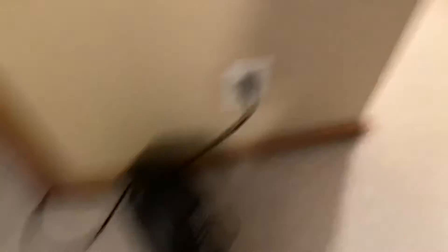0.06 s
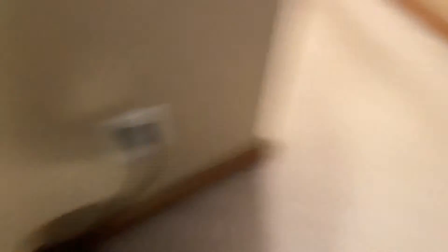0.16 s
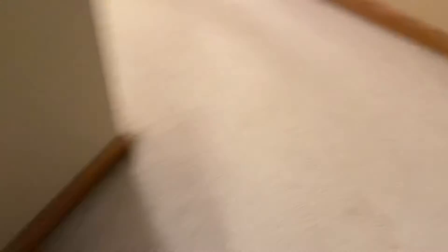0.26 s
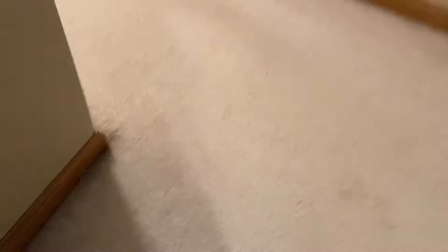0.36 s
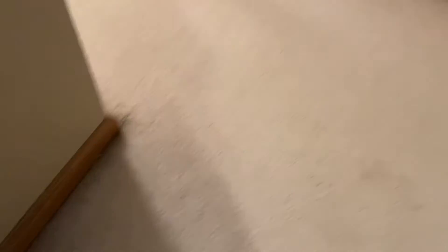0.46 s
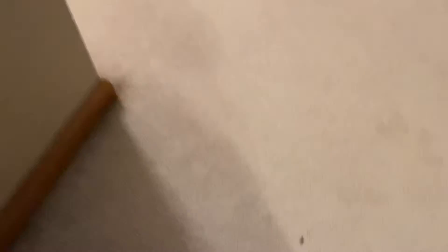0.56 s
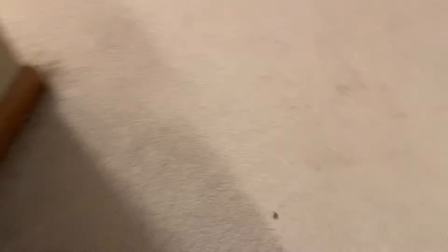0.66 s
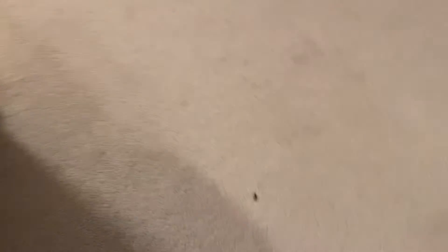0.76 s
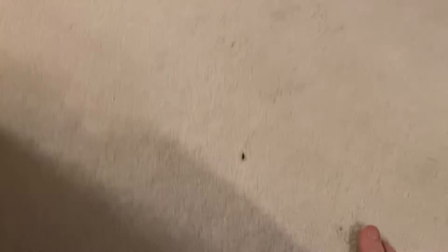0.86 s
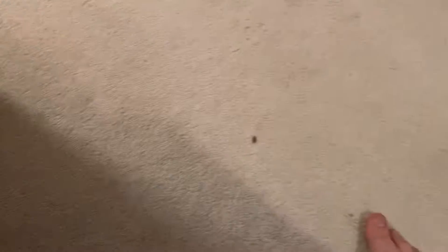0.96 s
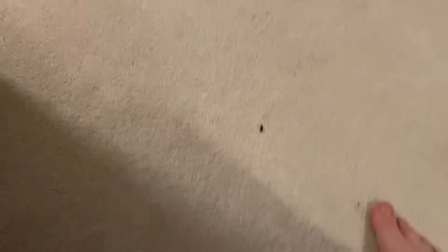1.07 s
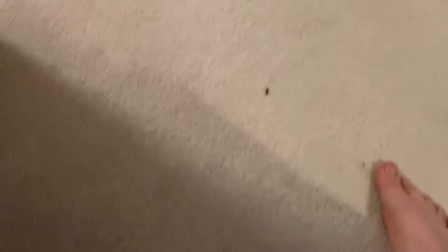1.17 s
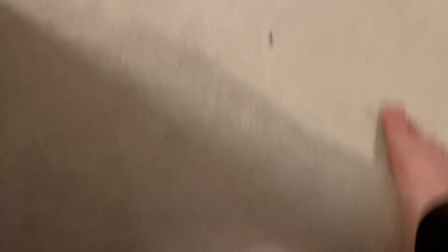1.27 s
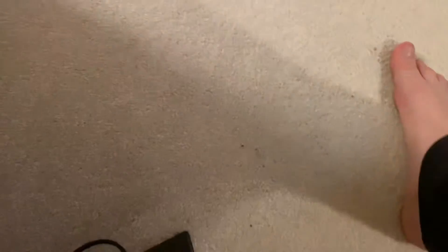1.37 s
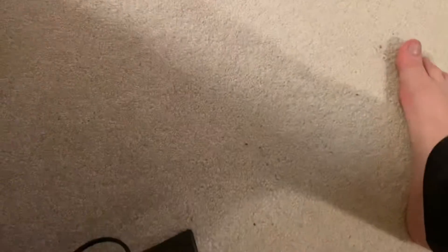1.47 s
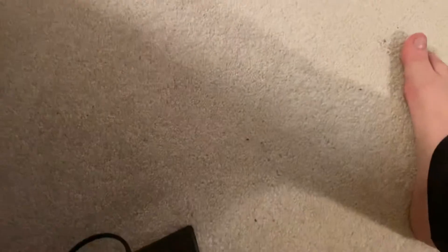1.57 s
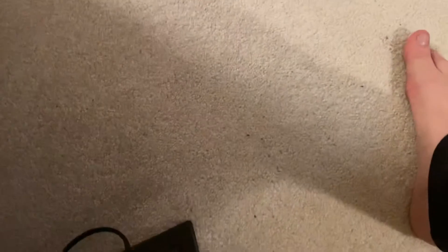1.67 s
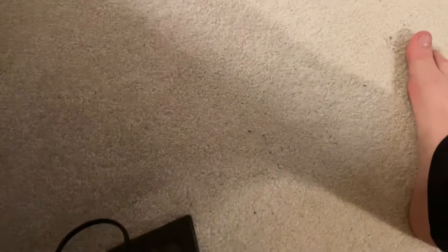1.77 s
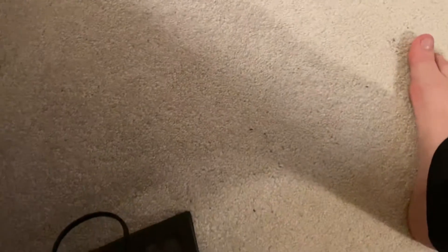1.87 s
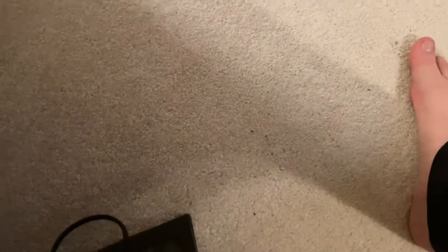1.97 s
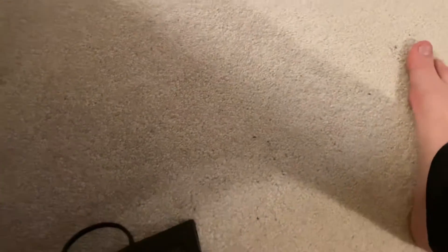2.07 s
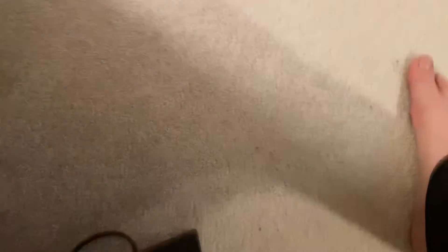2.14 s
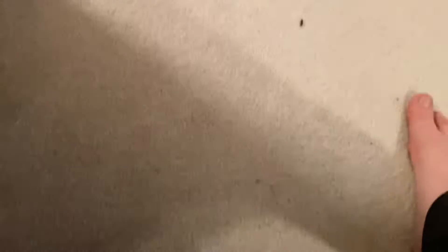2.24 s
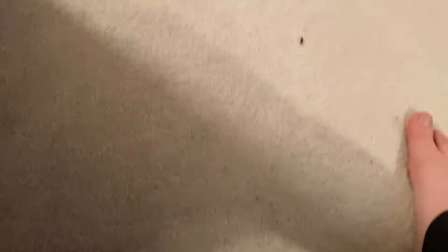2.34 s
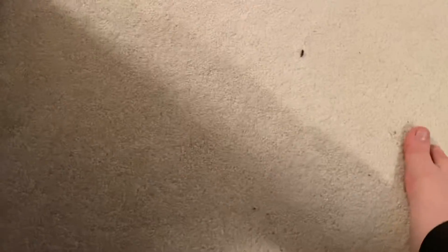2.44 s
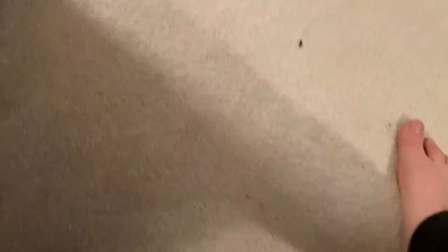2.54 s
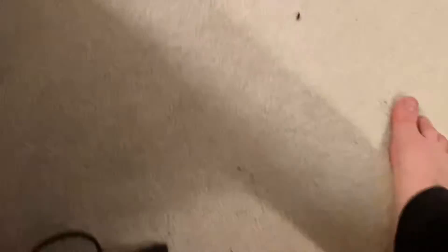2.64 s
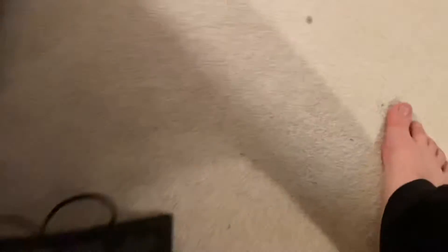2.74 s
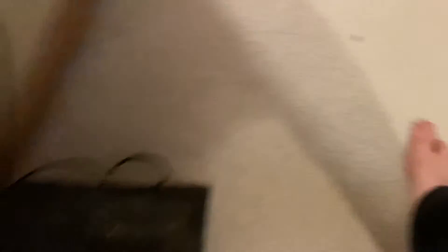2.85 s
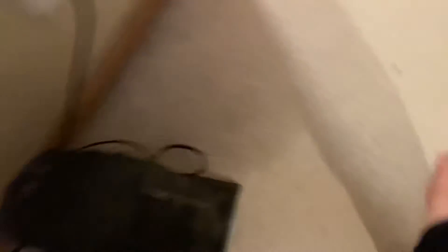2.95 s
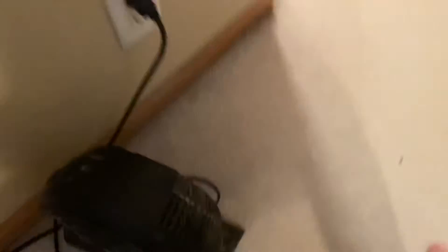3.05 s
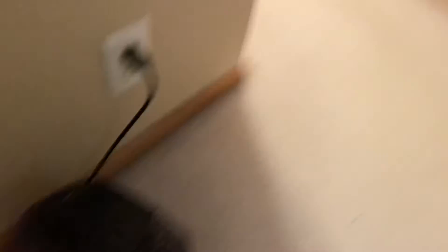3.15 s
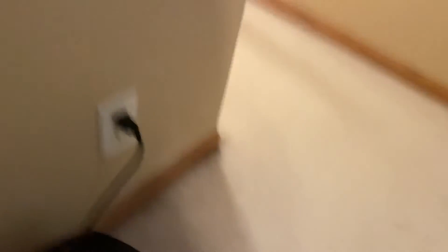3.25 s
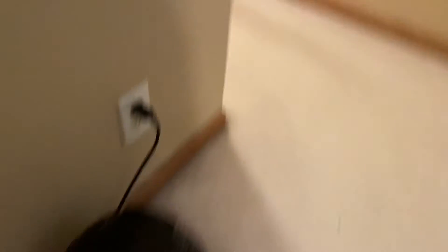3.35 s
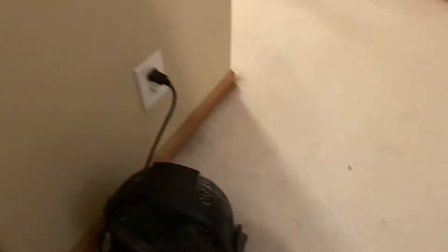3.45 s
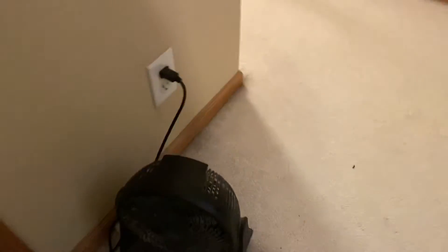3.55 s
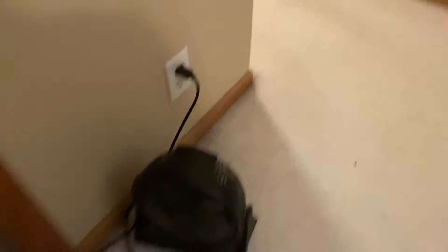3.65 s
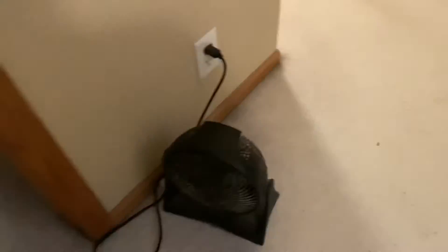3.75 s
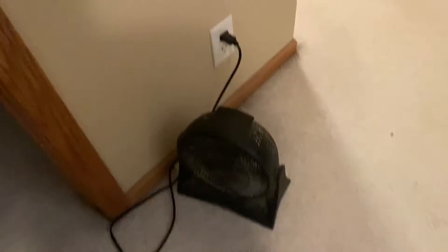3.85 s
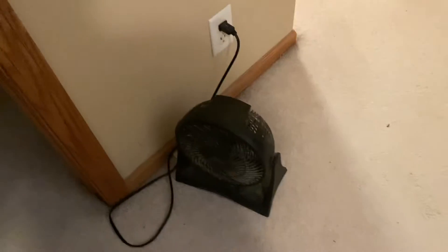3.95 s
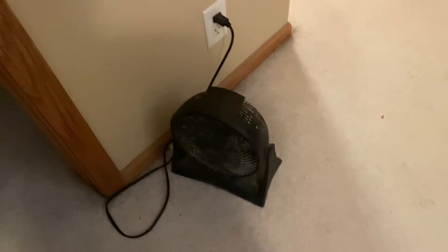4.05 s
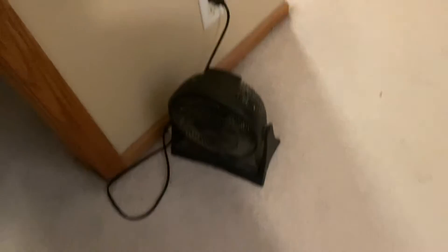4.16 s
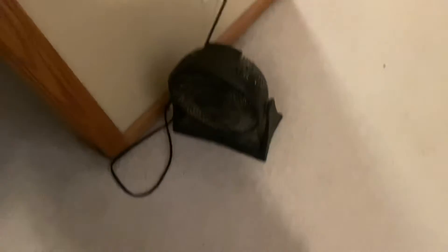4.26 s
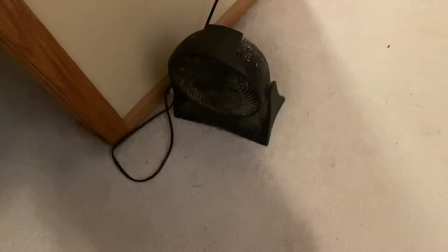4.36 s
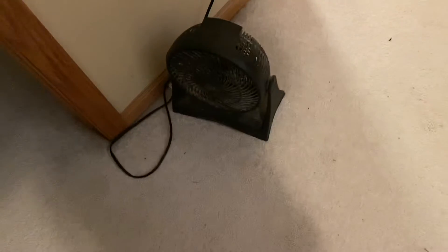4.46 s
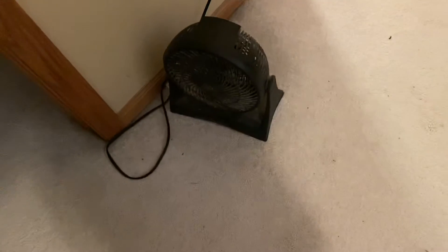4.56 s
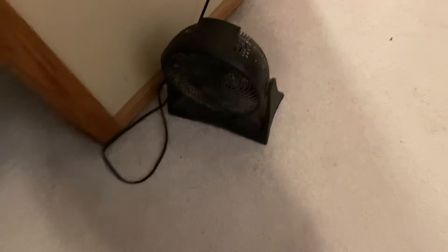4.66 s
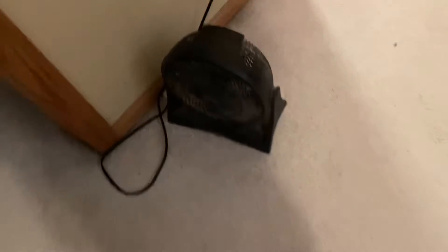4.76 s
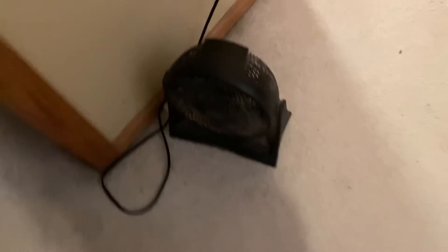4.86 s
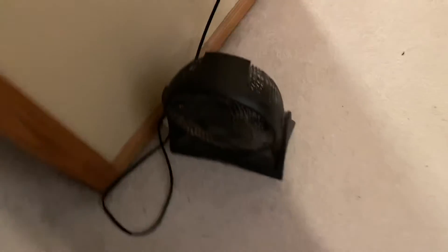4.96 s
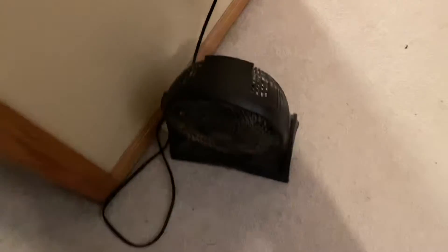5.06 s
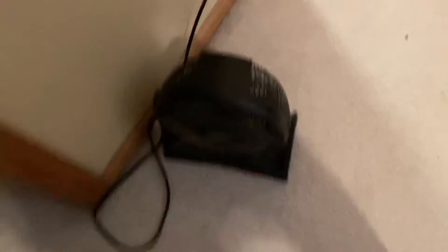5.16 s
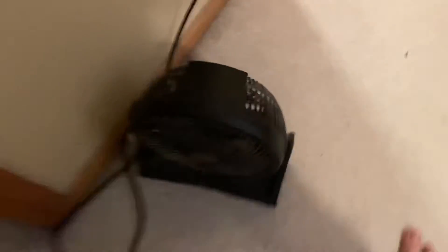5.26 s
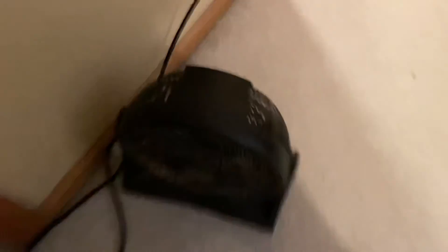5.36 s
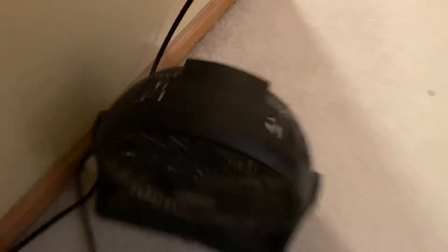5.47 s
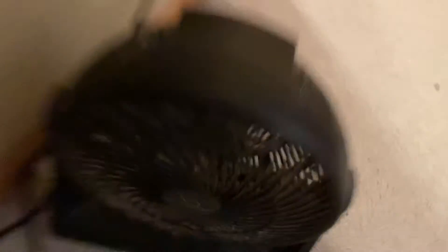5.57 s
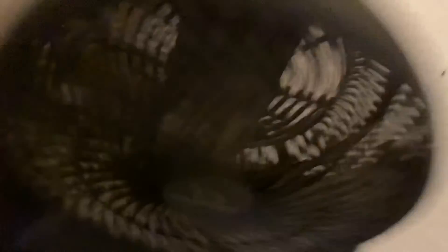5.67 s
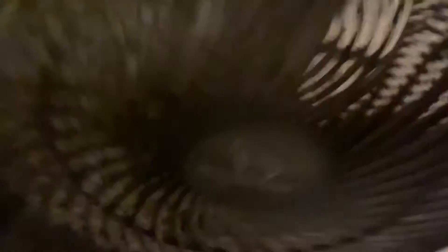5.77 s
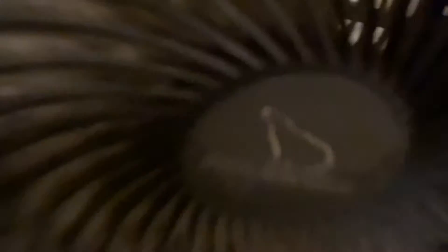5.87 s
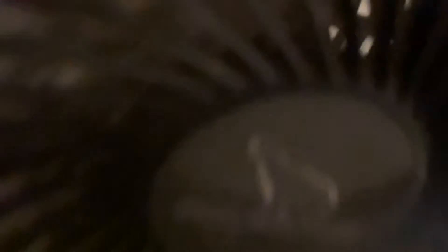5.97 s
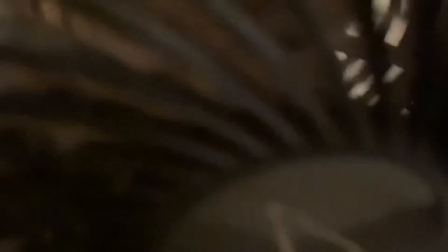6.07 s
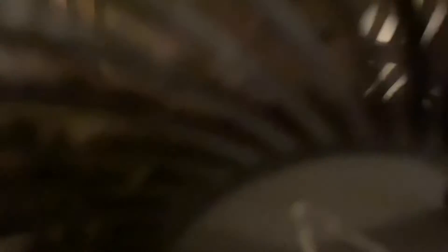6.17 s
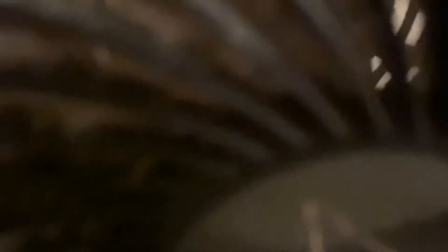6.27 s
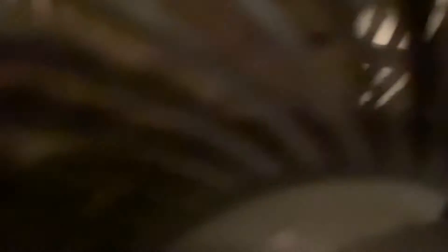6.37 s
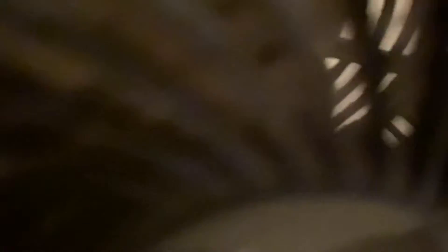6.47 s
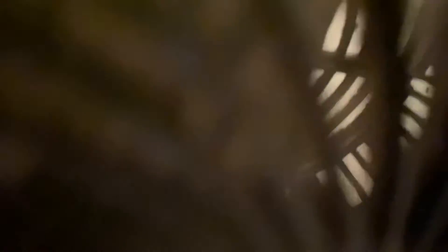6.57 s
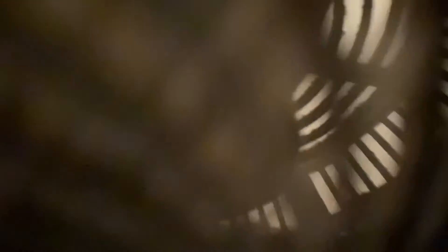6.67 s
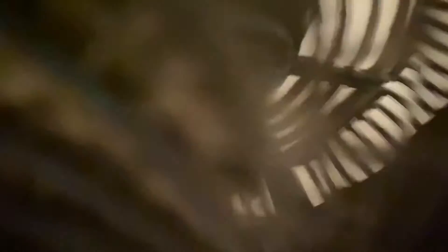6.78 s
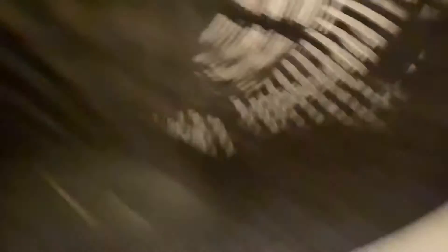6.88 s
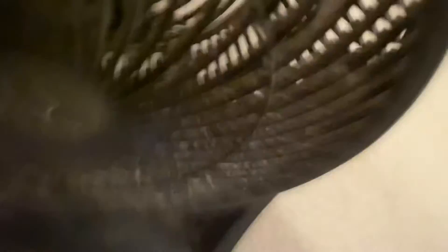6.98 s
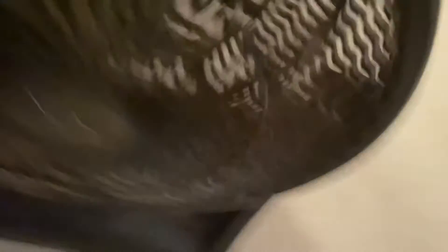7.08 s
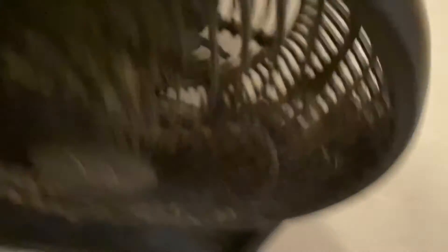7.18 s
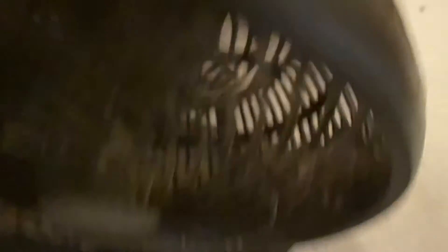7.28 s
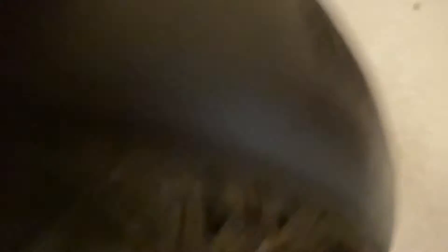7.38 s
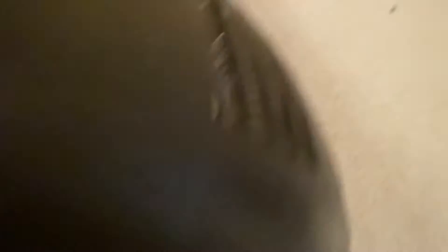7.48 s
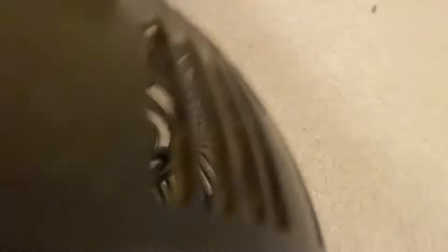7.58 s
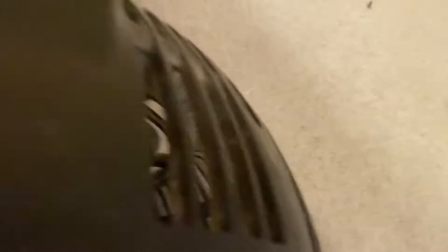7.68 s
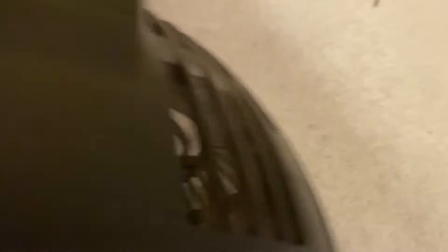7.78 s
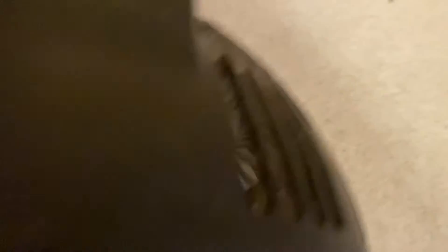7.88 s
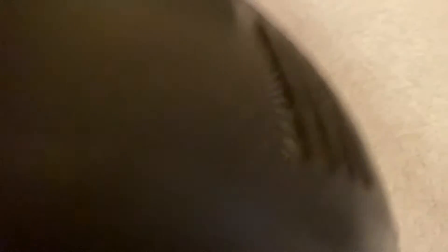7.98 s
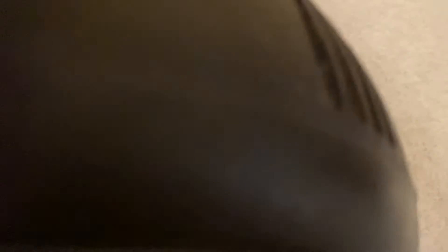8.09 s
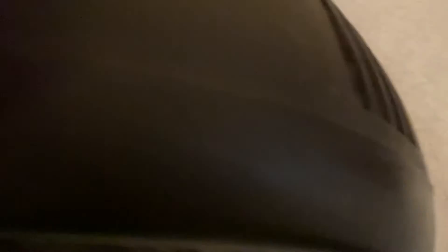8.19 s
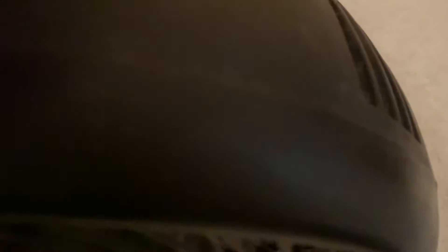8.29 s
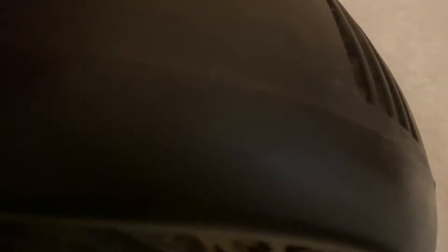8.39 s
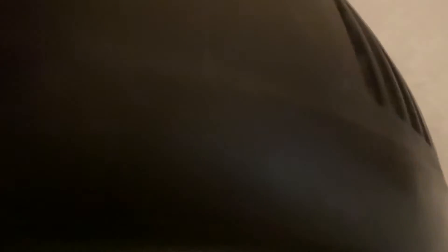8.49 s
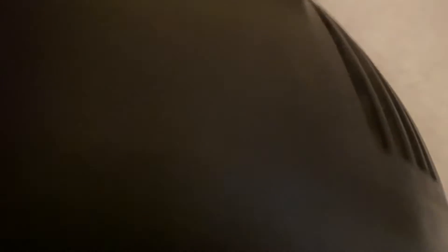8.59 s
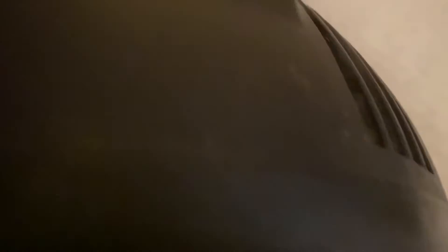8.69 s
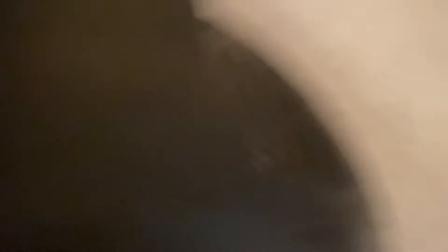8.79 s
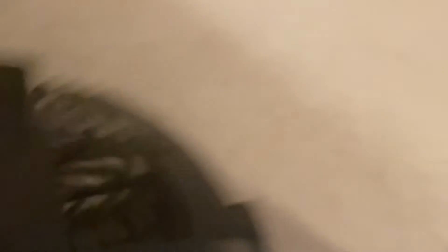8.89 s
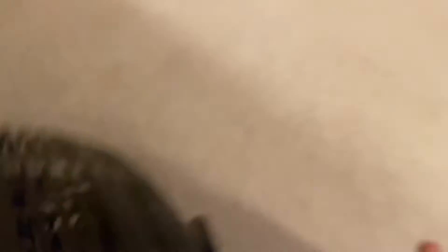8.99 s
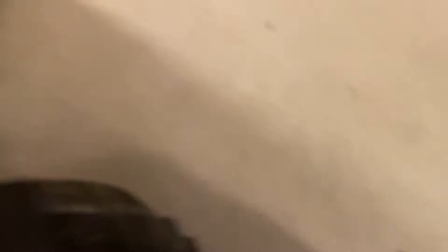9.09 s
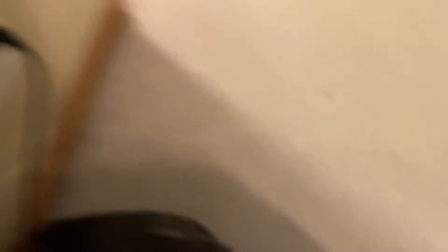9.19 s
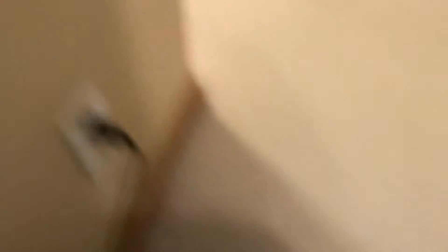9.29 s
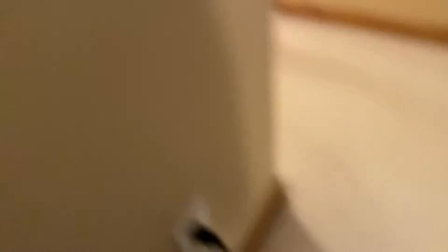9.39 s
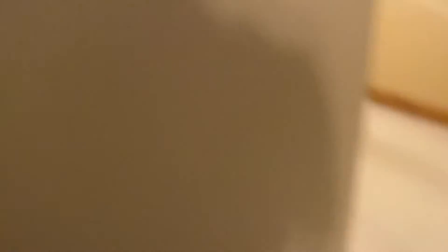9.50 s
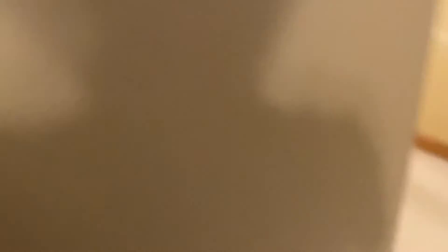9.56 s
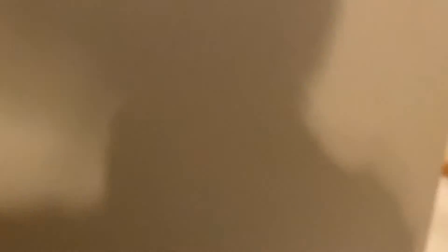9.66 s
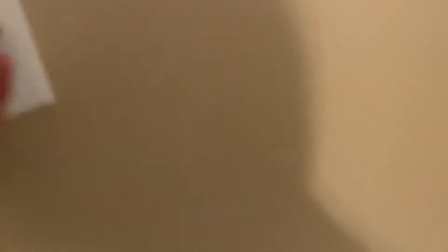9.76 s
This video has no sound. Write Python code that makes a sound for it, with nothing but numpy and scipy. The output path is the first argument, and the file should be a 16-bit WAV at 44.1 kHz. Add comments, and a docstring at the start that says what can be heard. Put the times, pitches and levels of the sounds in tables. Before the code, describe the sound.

A handheld stereo microphone hears low house rumble, soft thuds and cloth rustle, then a fan switched on at a distance. Its whir climbs gradually in pitch, then swells into a very close, gusty roar with blade drone and motor hum. After a click and momentary slowing, a hard click turns it off. The airflow fades away quickly, feet scuff on carpet, and a sharp wall switch clacks.

```python
"""A small three-blade fan on a carpet is switched on with a click and slowly runs up to speed.
Turbulence, blade tones, motor hum and frame buzz follow its speed and the microphone's path into the draught.
A turn of the knob makes the speed sag and recover; then the fan is switched off and coasts.
Filtered noise makes the shuffling of bare feet and clothes; short blows ring resonances for the knob and
case clicks, handling taps and knocks, and a wall switch. Soft thuds and a low rumble fill the quiet room."""
import sys
import numpy as np
from scipy import signal
from scipy.fft import rfft, irfft, next_fast_len
from scipy.io import wavfile
from scipy.ndimage import uniform_filter1d, map_coordinates

SR = 44100
rng = np.random.default_rng(int(sys.argv[2]) if len(sys.argv) > 2 else 0)


def to_wav(s):
    """Save 16-bit WAV."""
    ch = np.atleast_2d(s).T  # columns
    pcm = np.round(np.clip(ch, -1, 1) * 32767)  # PCM
    wavfile.write(sys.argv[1], SR, pcm.astype(np.int16))


N = 433503

ON_S, OFF_S = 2.281, 8.542  # motor current flows between these
FULL_HZ = 144.2  # blade passes per second at full speed
LEFT_RIGHT_HALVES = np.array([[.5], [-.5]])  # splits a left-minus-right dB between the channels


def amp(db):
    """Decibels to gain."""
    return 10 ** (np.asarray(db) / 20)


def rms(x):
    """Root mean square."""
    return np.sqrt(np.mean(x ** 2) + 1e-20)


def unit(x):
    """x at rms 1."""
    return x / rms(x)


def along(points, hz):
    """(Hz, value) points read on a log-frequency axis."""
    f, v = np.transpose(points)
    return np.interp(np.log(hz + 1), np.log(f + 1), v)


def curves(rows):
    """One value per sample for each column after the time."""
    s, *cols = np.transpose(rows)
    return [np.interp(np.arange(N) / SR, s, c) for c in cols]


def during(start_s, end_s, fade_s):
    """1 between two times, fading linearly to 0 outside them."""
    t = np.arange(N) / SR
    return np.clip(1 + np.minimum(t - start_s, end_s - t) / fade_s, 0, 1)


def wobble(rate_hz):
    """Smooth random curve with rate_hz knots a second."""
    knots = rng.standard_normal(int(N * rate_hz / SR) + 4)
    return map_coordinates(knots, [np.arange(N) * rate_hz / SR])


def filtered(x, response):
    """x times a response of frequency."""
    n = x.shape[-1]
    m = next_fast_len(n + 8192)
    return irfft(rfft(x, m) * response(np.fft.rfftfreq(m, 1 / SR)), m)[..., :n]


def ring(x, modes):
    """x through parallel resonances (Hz, width Hz, dB) of alternating polarity."""
    def response(f):
        total = 0
        for k, (hz, width, db) in enumerate(modes):
            damping = 1j * f * width
            total = total + (-1) ** k * amp(db) * damping / (hz * hz - f * f + damping)
        return total
    return filtered(x, response)


def noise(spectrum, alike, lean=((1000, 0),), lead=((1000, 0),)):
    """Stereo noise with a mid of given spectrum and rms 1, correlation, left-right dB and left phase lead."""
    m = next_fast_len(N)
    hz = np.fft.rfftfreq(m, 1 / SR)
    a, b = rfft(rng.standard_normal((2, m)))
    turn = np.arccos(np.clip(along(alike, hz), -.9, .99)) / 2
    shared, apart = np.cos(turn), np.sin(turn)
    left = amp(along(lean, hz)) * np.exp(1j * along(lead, hz))
    mid = np.hypot(abs(left + 1) * shared, abs(left - 1) * apart)
    colour = amp(along(spectrum, hz)) / mid
    pair = np.array([left * (shared * a + apart * b), shared * a - apart * b])
    pair = irfft(colour * pair, m)[:, :N]
    return pair / rms(pair.mean(0))


def blade_rate():
    """Blade passes per second: a slow run-up, a sag under the knob, then air drag brakes the free rotor."""
    pull_hz, run_up_s, knee_hz = 187, 2.38, 2.517  # motor pulls towards pull_hz until the air holds it back
    sag_at_s, sag_fall_s, sag_hz, recover_s = 7.89, 0.117, 12.8, 0.549
    coast_s = 0.92  # time to half speed without current
    t = np.arange(N) / SR
    driven = np.clip(t, ON_S, OFF_S)
    pull = pull_hz * (1 - np.exp(-(driven - ON_S) / run_up_s))
    held = -knee_hz * np.logaddexp(-pull / knee_hz, -FULL_HZ / knee_hz)  # soft minimum
    since = driven - sag_at_s
    recovery = np.exp(-np.maximum(since - sag_fall_s, 0) / recover_s)
    sag = sag_hz * np.clip(since / sag_fall_s, 0, 1) * recovery
    return np.maximum(held - sag, 0) / (1 + np.maximum(t - OFF_S, 0) / coast_s)


def blade_phase(speed):
    """Angle of the blade passes; the speed is never quite steady."""
    return 2 * np.pi * np.cumsum(FULL_HZ * speed * (1 + 0.0041 * wobble(13))) / SR


def place():
    """Closeness of the microphone (1 at 5 cm, falling as 1 / distance) and its share of the draught."""
    # microphone path: time_s, distance_m, draught_share (0 out in the room, 1 in the draught)
    path = [(2.4, 1.05, 0.44), (3.0, 0.7, 0.11), (3.8, 0.57, 0.011), (4.25, 0.51, 0), (4.6, 0.38, 0.028),
            (5.0, 0.29, 0.013), (5.5, 0.17, 0.13), (5.78, 0.069, 0.78), (6.05, 0.049, 0.82),
            (6.75, 0.056, 0.86), (7.2, 0.13, 0.98), (8.2, 0.13, 1), (8.52, 0.12, 1), (8.85, 0.21, 0.99),
            (9.1, 0.4, 0.46), (9.45, 0.75, 0.077)]
    metres, near = curves(path)
    return 0.05 / metres, np.clip(near, 0, 1)


def airflow(phase, speed):
    """Turbulent air at the grille, and eddies on the microphone ports once they are in the draught."""
    # buffet, body, rush and hiss: low_hz, high_hz
    bands = [(55, 100), (170, 700), (1000, 4000), (5000, 8000)]
    # same bands: level_db (full speed, 5 cm), speed_power, out_of_draught_loss_db, rim_gain_db
    laws = [(-21.5, 1, 21.5, 2.5), (-17, 1.83, 1.5, 0), (-26, 2.35, 2, 0), (-41, 2.65, 0.5, -0.5)]
    # depth of the eddies per band: depth_db
    eddy_db = [1.5, 1.5, 0.7, 0.8]
    # gusts on the moving ports: peak_s, half_length_s (to 1/e), buffet_db, body_db
    gusts = [(5.772, 0.057, 9.5, 1.5), (5.912, 0.077, 1.5, 3), (6.29, 0.065, 6, 2.5), (6.48, 0.08, -2, 1.5),
             (6.642, 0.07, 5.5, 5), (6.775, 0.073, 7, 5), (6.9, 0.063, 3, 3.5), (7.02, 0.12, 5.5, 3),
             (8.717, 0.16, 4.5, -1)]
    # colour out in the room, in the draught: freq_hz, relative_db_per_hz
    far_colour = [(25, -38), (55, 8), (160, -6), (260, -0.5), (330, -11), (390, -6.5), (600, -17.5),
                  (950, -20), (1600, -19), (2700, -24), (5000, -36), (7400, -37.5), (11000, -44),
                  (15000, -49)]
    near_colour = [(20, -27), (30, -6), (45, 3.5), (100, 4), (200, -1.5), (330, -7.5), (600, -15.5),
                   (1100, -26.5), (2100, -26.5), (3300, -31.5), (5500, -35.5), (7400, -37.5), (11000, -42),
                   (15000, -48)]
    # left-right correlation, clipped in noise(): freq_hz, correlation
    far_alike = [(60, 0.5), (250, 2), (640, 0.45), (1400, .45), (3100, 0.26), (6000, 1.5), (9000, -4.5)]
    near_alike = [(60, 0.87), (200, 0.62), (400, 0.5), (700, 0.67), (1400, 0.53), (2400, 0.8), (4400, .85),
                  (7500, 0.75)]
    # left minus right: freq_hz, lean_db
    far_lean = [(60, 0), (250, -3), (550, -0.5), (900, 4.5), (1650, 1), (3500, 5), (7500, 0.5)]
    near_lean = [(60, 0.5), (110, -0.8), (200, 3.5), (380, 6.5), (700, 13.5), (1290, 9.5), (2380, 6),
                 (4400, 5.5), (7500, 4)]
    # left port leads in the draught: freq_hz, lead_rad
    near_lead = [(60, 0.2), (300, 0.5), (800, 1.0), (1300, 2.63), (2100, 0.16), (4000, 0.23), (7000, 0.5)]
    # microphone off the axis, beside the rim: start_s, end_s, fade_s
    at_rim = (7.9, 9.0, 0.24)
    # housing screens the hiss: start_s, end_s, fade_s (the fades overlap, peaking near 0.8 of the loss)
    behind_housing = (7.77, 7.65, 0.32)
    screen_db = -2.5
    chop_depth = [0.03, 0.19, 0.17, 0.21]  # per band
    flutter_depth = 0.15  # once per turn, out of the draught

    close, near = place()
    far_air = noise(far_colour, far_alike, far_lean)
    near_air = noise(near_colour, near_alike, near_lean, near_lead)
    centres = np.sqrt(np.prod(bands, axis=1))
    eddies = near * (0.6 * wobble(14) + 0.95 * wobble(55))
    t = np.arange(N) / SR
    buffet_db, body_db = sum(np.outer(dbs, np.exp(-((t - s) / length) ** 2)) for s, length, *dbs in gusts)
    swell_db = [buffet_db, body_db, 0, screen_db * during(*behind_housing)]
    rim = during(*at_rim)
    flutter = 1 + flutter_depth * (1 - near) * np.cos(phase / 3)
    out = np.zeros((2, N))
    for k, ((lo, hi), (db, power, draught_db, rim_db)) in enumerate(zip(bands, laws)):
        strength = lambda x: rms(filtered(x.mean(0), lambda hz: (hz > lo) & (hz < hi)))
        far = np.sqrt(1 - near) * far_air / strength(far_air)
        air = far + np.sqrt(near) * near_air / strength(near_air)
        weights = list(zip(centres, np.eye(len(centres))[k]))  # crossfades between band centres
        band = filtered(air, lambda hz: along(weights, hz))
        level_db = db + draught_db * (near - 1) + rim_db * rim + swell_db[k] + eddy_db[k] * eddies
        level = close * speed ** power * amp(level_db)
        # the stream is chopped twice per blade pass
        out += band * level * (1 + chop_depth[k] * np.cos(2 * phase)) * flutter
    return out


def blade_tones(phase, speed):
    """Three blades push the air once each per turn; a slight imbalance sounds once per turn."""
    # partials: blade_rate_multiple, level_db (full speed, 5 cm, before beaming)
    partials = [(1, -15), (2, -26.5), (3, -37), (1 / 3, -28.5)]
    # uneven beaming round the fan: time_s, fundamental_and_below_db, overtones_db
    beaming = [(3.8, -12, -2), (4.65, 5, 15.5), (5.3, -11, -1), (5.6, -2, 5.5), (5.9, -1.5, 2.5),
               (6.15, 3, -2), (6.55, 4.5, -0.5), (6.75, -0.5, 7), (7.05, -4.5, 1.5), (7.4, 1.5, 6.5),
               (7.65, 8.5, 10), (7.87, 3, 11.5), (8.15, 2, 7.5), (8.5, 6, 10), (8.85, 7.5, 16.5),
               (9.05, 8.5, 8), (9.3, -3, -2)]
    out_of_draught_loss_db, speed_power = 6.5, 2.44
    close, near = place()
    low_db, high_db = curves(beaming)
    tone = 0
    for multiple, db in partials:
        k = round(3 * multiple) / 3  # whole multiples of the turn rate
        beam_db = high_db if k > 1 else low_db
        level = amp(db + beam_db + 1.5 * wobble(22))
        tone = tone + level * np.sin(k * phase + 0.029 * wobble(28))
    place_db = out_of_draught_loss_db * (near - 1) + near * LEFT_RIGHT_HALVES
    return tone * close * speed ** speed_power * amp(place_db)


def motor():
    """The iron hums at even multiples of the mains while the current flows, far louder from close by."""
    # magnetic hum: mains_multiple, relative_db (before close_db and distance)
    hum_partials = [(2, -55.5), (4, -64), (6, -67.5), (8, -76)]
    mains_hz, close_db, distance_power = 60, 35.5, 1.47  # close_db: hum gain at 5 cm
    whine_order, whine_db, whine_from_s, whine_rough_rad = 12, -72, 2.6, 0.9
    phase = 2 * np.pi * mains_hz * np.arange(N) / SR
    hum = sum(amp(db + 0.46 * wobble(3.6)) * np.sin(round(k) * phase) for k, db in hum_partials)
    whine = np.sin(whine_order * phase + whine_rough_rad * wobble(60))
    whine = whine * amp(whine_db + 3.7 * wobble(16)) * during(whine_from_s, OFF_S, .1)
    return (hum * amp(close_db) * place()[0] ** distance_power + whine) * during(ON_S, OFF_S, .02)


def frame(phase, speed):
    """The motor shakes the frame, which buzzes at its resonances, fluttering once per turn of the rotor."""
    # frame resonances: freq_hz, width_hz, relative_db
    modes = [(385, 30, 0), (722, 25, -13), (1700, 350, -20)]
    buzz_db, speed_power = -50.5, 1.07  # buzz_db at full speed
    shake = noise([(1000, 0)], [(1000, 0.46)]) * (1 + 0.65 * np.cos(phase / 3))
    return unit(ring(shake, modes)) * amp(buzz_db) * speed ** speed_power * during(ON_S, OFF_S, 0.064)


def frame_sweep(phase, speed):
    """The frame sings as overtones of the changing blade rate cross its resonance."""
    # overtones: blade_rate_multiple, level_db (on resonance)
    orders = [(5, -60), (6, -48.5), (9, -54), (12, -65)]
    centre_hz, width_hz = 397, 30
    gain = lambda k: 1 / (1 + (2 * (k * FULL_HZ * speed - centre_hz) / width_hz) ** 2)
    song = sum(amp(db) * gain(round(k)) * np.sin(round(k) * phase) for k, db in orders)
    return song * during(ON_S, OFF_S, .02)


def shaft_rub(phase, speed):
    """The rotor rubs once per turn with varying force, most strongly at its loosest speed."""
    # rubbing resonances: freq_hz, width_hz, relative_db
    modes = [(1380, 280, -1), (1800, 260, -1)]
    level_db, scatter_db = -29, 1.5  # level_db: 5 cm, loosest speed, peak of contact
    loosest_speed, speed_range = 0.67, 0.28  # shares of full speed
    width_turns = .09
    turns = phase / (3 * 2 * np.pi)
    force = amp(scatter_db * rng.standard_normal(int(turns[-1]) + 1))[turns.astype(int)]
    contact = np.exp(-((turns % 1 - .5) / width_turns) ** 2)
    loose = np.exp(-((speed - loosest_speed) / speed_range) ** 2)
    scrape = unit(ring(noise([(1000, 0)], [(1000, 0.46)]), modes))
    return amp(level_db) * scrape * contact * force * loose * place()[0] * during(ON_S, OFF_S, .02)


def walls(hit):
    """The room hears a blow from all sides, so its answer has a blurred colour; treble dies first."""
    # reverberation: freq_hz, decay_60db_s
    decay = [(200, 0.26), (1000, 0.19), (1800, 0.22), (3000, 0.19), (6000, 0.15), (14000, 0.076)]
    blur_hz = 650
    n = hit.shape[1]
    hz, t, z = signal.stft(rng.standard_normal((2, n)), SR, nperseg=256)
    fading = z * amp(-60 * t / along(decay, hz)[:, None])
    tail = signal.istft(fading, SR, nperseg=256)[1][:, :n]
    power = np.mean(abs(rfft(hit)) ** 2, axis=0)
    colour = np.sqrt(abs(uniform_filter1d(power, int(blur_hz * n / SR))))
    return filtered(tail / np.linalg.norm(tail[0]), lambda f: np.interp(f, np.fft.rfftfreq(n, 1 / SR), colour))


def clicks(rows, shell, knock_modes, contact_t60, knock_t60, gain_db, room_db, apart):
    """A sharp blow with a short rough contact rings a shell, knocks its mount and snaps in the treble."""
    # treble snap: freq_hz, relative_db_per_hz
    snap_colour = [(2000, -48), (6000, -0.5), (11000, 2), (15000, -1)]
    # dry crack of the contact: freq_hz, relative_db_per_hz
    crack_colour = [(400, -15), (1200, -8), (2400, 9), (5000, -3), (8000, -23)]
    # answer of the carpeted room: freq_hz, gain_db
    echo_colour = [(400, 0), (780, 0), (1100, -4), (1900, 2.5), (3200, -2.5), (7000, -2.5), (12000, -5)]
    crack_db = -12.5  # beside the ring
    strike_spread_db = 2.5  # each blow meets the shell elsewhere
    out, t = np.zeros((2, N + SR)), np.arange(SR // 3) / SR
    sized = lambda x: x / rms(x[:, :SR // 200])  # rms 1 over the first 5 ms
    blow = 7.0 * (t == 0)
    for s, db, knock_db, snap_db, hardness_db, lean_db in rows:
        grit = rng.standard_normal(len(t)) + apart * rng.standard_normal((2, len(t)))
        grit = grit * (1 - np.exp(-t / 0.00024))
        contact = blow + grit * amp(-60 * t / contact_t60)
        tilt_db = lambda hz: hardness_db * np.log2(np.clip(hz, 1000, 6000) / 2000)
        struck = [(hz, width, level + tilt_db(hz) + strike_spread_db * rng.standard_normal())
                  for hz, width, level in shell]
        clack = ring(contact, struck)
        crack = filtered(contact, lambda hz: amp(along(crack_colour, hz) + tilt_db(hz)))
        # one push plus a little roughness sets the mount ringing
        push = t * np.exp(-t / .00015)
        shove = push / push.max() + 0.5 * grit * amp(-60 * t / knock_t60)
        knock = ring(shove, knock_modes)
        snap = filtered(grit * amp(-60 * t / 0.012), lambda hz: amp(along(snap_colour, hz)))
        hit = sized(clack) + amp(crack_db) * sized(crack)
        hit = hit + amp(knock_db) * sized(knock) + amp(snap_db) * sized(snap)
        echo = filtered(walls(hit), lambda hz: amp(along(echo_colour, hz)))
        direct = hit * amp(lean_db * LEFT_RIGHT_HALVES)
        out[:, round(s * SR):][:, :len(t)] += amp(db + gain_db) * (direct + amp(room_db) * echo)
    return out[:, :N]


def handling_clicks():
    """Clicks of the fan's knob and case, with taps, ticks and dull knocks of handling, from one set of modes."""
    # start_s, relative_db, knock_db, snap_db, hardness_db_per_octave, left_minus_right_db
    events = [(0.0235, -38, -5, 0, 0, 1), (0.031, -42, -8, 1, -6, -1), (0.045, -56, -6, 2, 0, 1),
              (0.31, -57, -6, -6, -3, 1), (0.774, -60, -10, -3, -4, 3), (0.8984, -36.5, -3.5, -2, 2, 7),
              (0.9082, -38, 2, 9.5, 5, 8), (0.9677, -47, -4, -16, -11, 7), (1.1628, -50.5, -15, -1, 3, 7),
              (1.296, -48.5, -9, -5, 1, 6), (1.5519, -55, 6.5, -20, -3, 3.5),
              (1.9065, -45.5, -1, -26, -8, 6.5), (1.912, -53, 10.5, -24, -8, 6.5),
              (2.1011, -44, -22, 2, 4, 6), (2.2811, -23.5, -8, -4.5, 0, 6.5),
              (2.8554, -43.5, -12, -12, 10, 6), (4.8394, -38, -4, -2, 6, 4), (6.697, -26.5, -6, 4, 2, 14),
              (7.9673, -23, -7, -12, 4, 6), (8.5425, -15, -16, -3, -4.5, 9), (9.161, -42.5, 0, -24, -12, 1),
              (9.2618, -46, -6, -9, 0, 1), (9.317, -47, -7, -11, 0, 3), (9.679, -50, 9, -20, -4, 3)]
    # bright, then dull resonances: freq_hz, width_hz, relative_db
    bright_modes = [(1250, 280, -10), (1660, 260, 0), (2150, 600, -5), (2850, 520, 2), (3400, 520, 2),
                    (4050, 700, -5), (4900, 1200, -8)]
    dull_modes = [(380, 70, -7), (770, 75, 0), (1200, 450, -18)]
    return clicks(events, bright_modes, dull_modes, contact_t60=0.016, knock_t60=0.087,
                  gain_db=-9.0, room_db=-5.5, apart=0.55)


def wall_switch():
    """The wall switch snaps, ringing its plate and box."""
    # start_s, relative_db, knock_db, snap_db, hardness_db_per_octave, left_minus_right_db
    events = [(9.798, -7.5, -13, -19, -0.5, 4)]
    # plate, then box resonances: freq_hz, width_hz, relative_db
    plate = [(2000, 480, -3), (2450, 700, 0), (2940, 400, 1), (3620, 560, 6), (4200, 850, -3),
             (5500, 1300, -5)]
    box = [(300, 200, -9), (640, 110, -4), (930, 140, 0)]
    return clicks(events, plate, box, contact_t60=0.026, knock_t60=0.037,
                  gain_db=-7.5, room_db=-3.0, apart=0.89)


def strokes(rows):
    """Gain of rubbing strokes that swell to a peak and fade, 20 dB over each rise or fall time."""
    t = np.arange(N) / SR
    return sum(amp(db - 20 * np.maximum((s - t) / rise, (t - s) / fall)) for s, rise, fall, db in rows)


def shuffling():
    """Cloth brushes and its fibres catch, each stroke in its own band; soles scuff the carpet."""
    # clothing and skin: peak_s, rise_s, fall_s, relative_db, lowest_hz, highest_hz
    rustles = [(0.012, 0.03, 0.034, -52, 400, 5000), (0.14, 0.3, 0.35, -59.5, 700, 14000),
               (0.245, 0.16, 0.08, -57, 800, 4000), (0.446, 0.035, 0.048, -62, 1700, 12000),
               (0.62, 0.41, 0.33, -66, 900, 7000), (0.72, 0.04, 0.037, -67, 900, 2600),
               (0.92, 0.01, 0.093, -60, 700, 12000), (1.1, 0.33, 0.55, -74.5, 1100, 12000),
               (2.023, 0.04, 0.05, -62.5, 900, 5000), (2.38, 0.51, 0.5, -72, 1200, 15000),
               (2.575, 0.06, 0.099, -64.5, 500, 3000), (2.635, 0.071, 0.1, -60, 1650, 2980),
               (2.805, 0.11, 0.28, -56.5, 400, 5100), (3.32, 0.015, 0.099, -51.5, 1800, 8000),
               (3.38, 0.058, 0.066, -48.5, 1700, 8000), (3.63, 0.032, 0.11, -54, 1200, 8000),
               (9.59, 0.25, 0.21, -54.5, 400, 6000)]
    # soles on carpet: peak_s, rise_s, fall_s, relative_db
    scuffs = [(0.035, 0.035, 0.027, -55), (0.65, 0.04, 0.085, -60.5), (0.868, 0.023, 0.034, -58),
              (0.975, 0.05, 0.072, -60), (2.02, 0.04, 0.05, -63), (3.203, 0.015, 0.047, -48.5),
              (9.385, 0.12, 0.16, -52.5), (9.44, 0.033, 0.03, -63), (9.61, 0.11, 0.097, -51),
              (9.7, 0.031, 0.05, -52)]
    # colour of cloth, then soles: freq_hz, relative_db_per_hz
    cloth_colour = [(250, -5), (700, -0.5), (1200, -2.5), (2300, -3), (4500, -9), (7400, -12), (11000, -9),
                    (15000, -23)]
    sole_colour = [(80, -15), (220, 4.5), (400, -4), (700, -5), (1300, -18), (2200, -18.5), (5000, -35),
                   (15000, -42)]
    catches_per_s, catch_share = 520, .7  # share beside the smooth brushing
    grains = rng.standard_normal(N) + .5 * rng.standard_normal((2, N))
    catches = (rng.random(N) < catches_per_s / SR) * grains
    crackle = unit(filtered(catches, lambda hz: amp(along(cloth_colour, hz))))
    brushing = noise(cloth_colour, [(1000, 0.29)])
    cloth = amp(0.99 * wobble(66) + 0.71 * wobble(400)) * (brushing + catch_share * crackle)
    out = strokes(scuffs) * amp(2.5 * wobble(150)) * noise(sole_colour, [(300, 0.39), (1500, 0.3)])
    for s, rise, fall, db, low_hz, high_hz in rustles:
        span = slice(max(int((s - 2 * rise) * SR), 0), int((s + 2 * fall) * SR))
        band = lambda hz: hz ** 4 / np.sqrt((hz ** 8 + low_hz ** 8.) * (1 + (hz / high_hz) ** 8))
        out[:, span] += filtered(cloth[:, span], band) * strokes([(s, rise, fall, db)])[span]
    return out


def footfalls():
    """Footfalls and bumps of the hand each set off a short low thud with some rumble of the floor."""
    # start_s, level_db, pitch_hz, time_to_peak_s
    thuds = [(0.03, -51, 130, 0.0066), (0.68, -46.5, 58, 0.017), (0.735, -50, 70, 0.028),
             (0.865, -44, 58, 0.019), (1.11, -49, 60, 0.017), (2.945, -42.5, 55, .02),
             (3.135, -41, 66, .02), (3.19, -44, 80, .018), (3.24, -42, 50, .015), (9.148, -35, 54, 0.019),
             (9.25, -45, 52, .02), (9.68, -40, 144, 0.011)]
    # floor rumble: freq_hz, relative_db_per_hz
    floor_colour = [(25, -6), (55, 5.5), (110, -1), (250, -12), (600, -34.5), (2000, -36), (8000, -44)]
    t = np.arange(N) / SR
    rumble = amp(-6) * noise(floor_colour, [(100, 0.63)])
    out = np.zeros((2, N))
    for s, db, hz, rise in thuds:
        span = slice(int(s * SR), int((s + .5) * SR))
        age = t[span] - t[span][0]
        envelope = amp(db) * age / rise * np.exp(1 - age / rise)
        out[:, span] += envelope * (np.sin(2 * np.pi * hz * age) + rumble[:, span])
    return out


def room():
    """Low rumble of the house as coloured noise with a few wavering tones."""
    # rumble: freq_hz, relative_db_per_hz
    rumble_colour = [(20, -33), (35, -14), (58, -2), (100, -8), (170, -15), (300, -19), (450, -30),
                     (600, -37), (800, -39.5), (1200, -52), (2100, -52), (3000, -56), (7000, -60.5),
                     (15000, -68)]
    # faint tones: pitch_hz, level_db (mean)
    faint_tones = [(58, -63.5), (120, -72), (251, -70), (311, -72.5), (480, -81)]
    rumble_db = -54
    t = np.arange(N) / SR
    tones = 0
    for hz, db in faint_tones:
        level = amp(db + 3.0 * wobble(8.6))
        tones = tones + level * np.sin(2 * np.pi * hz * t + 0.29 * wobble(3.84))
    return tones + amp(rumble_db) * noise(rumble_colour, [(200, 0.7), (1000, 0.07), (5000, .2)])


def scene():
    """Fan, handling and room together."""
    speed = blade_rate() / FULL_HZ
    phase = blade_phase(speed)
    fan = airflow(phase, speed) + blade_tones(phase, speed) + motor()
    fan = fan + frame(phase, speed) + frame_sweep(phase, speed) + shaft_rub(phase, speed)
    return fan + handling_clicks() + wall_switch() + shuffling() + footfalls() + room()


def record(dry):
    """The recorder cuts the deepest rumble, shares one treble, rounds the peaks and ends at its band limit."""
    # treble in opposite polarity between the channels: low_hz, high_hz
    opposed_bands = [(8350, 9600), (12500, 13750)]
    shared_from_hz, top_hz, ceiling = 6800, 15850, .95
    x = filtered(dry, lambda hz: hz ** 6 / (hz ** 6 + 36 ** 6))
    # phase turns by pi at each band edge, in the right channel only
    twist = lambda hz: sum(np.pi / 2 * (1 + np.tanh((hz - edge) / 130)) for edge in np.ravel(opposed_bands))
    shared = lambda hz: (1 + np.tanh((hz - shared_from_hz) / 300)) / 2
    treble = filtered(x.mean(0), lambda hz: shared(hz) * np.exp(1j * twist(hz) * np.array([[0], [-1]])))
    x = filtered(x, lambda hz: 1 - shared(hz)) + treble
    x = x / (1 + np.abs(x / ceiling) ** 6) ** (1 / 6)
    return filtered(x, lambda hz: (1 - np.tanh((hz - top_hz) / 150)) / 2)


dry = scene()
out = record(dry)
to_wav(out)
```